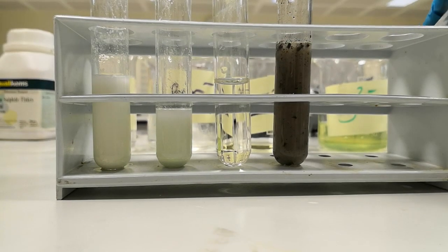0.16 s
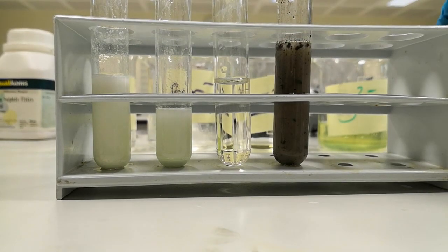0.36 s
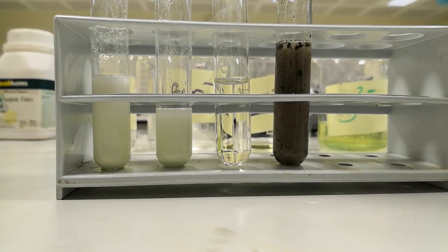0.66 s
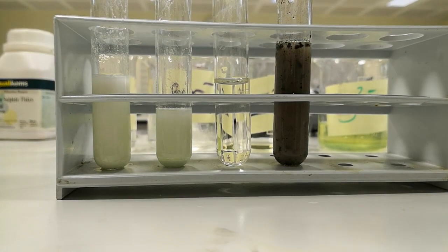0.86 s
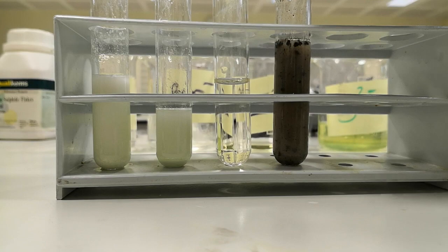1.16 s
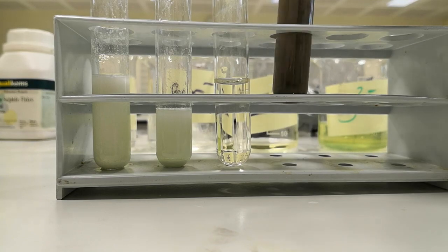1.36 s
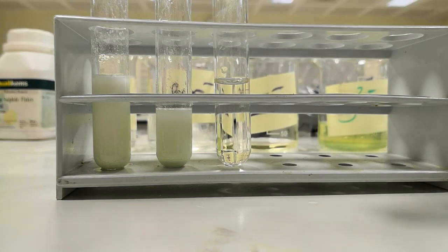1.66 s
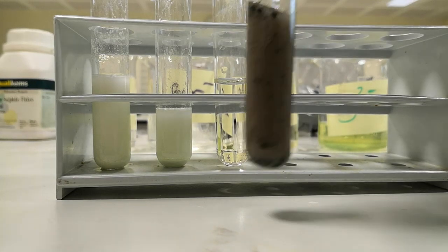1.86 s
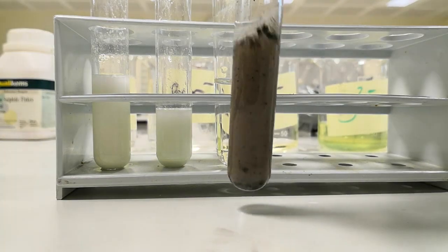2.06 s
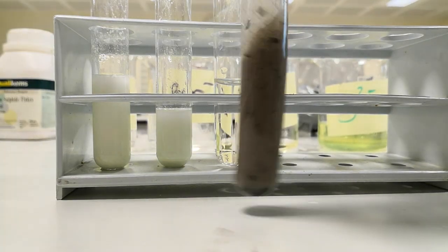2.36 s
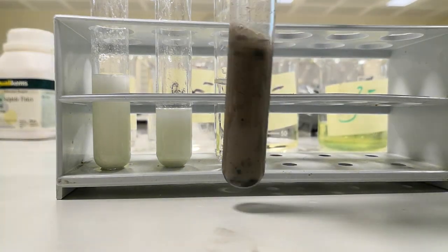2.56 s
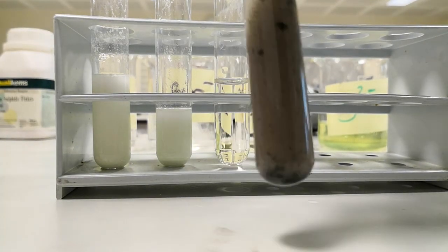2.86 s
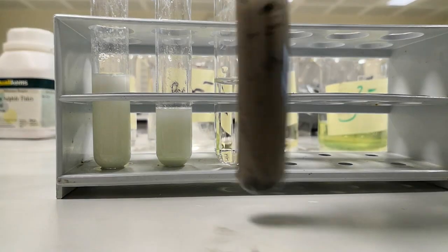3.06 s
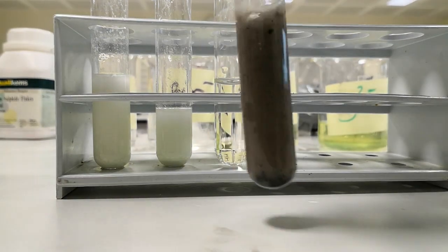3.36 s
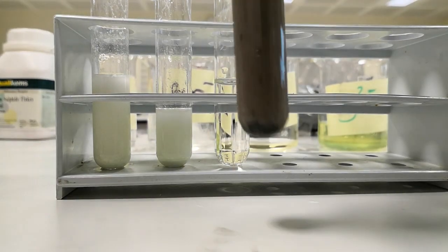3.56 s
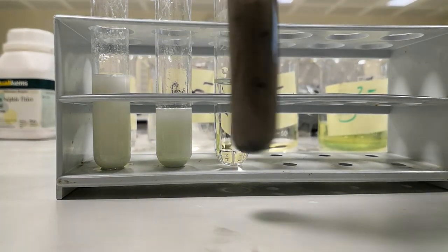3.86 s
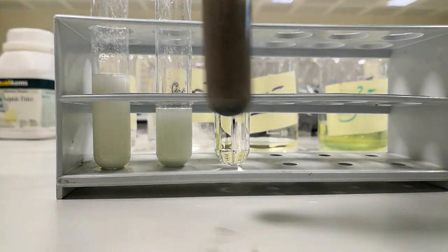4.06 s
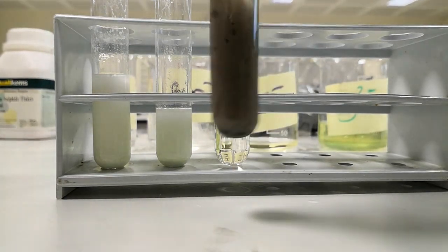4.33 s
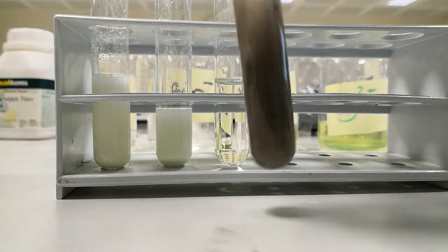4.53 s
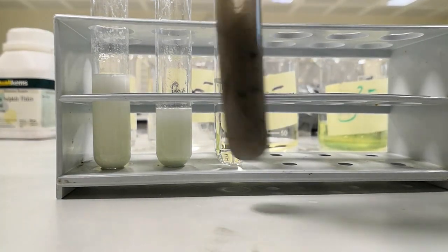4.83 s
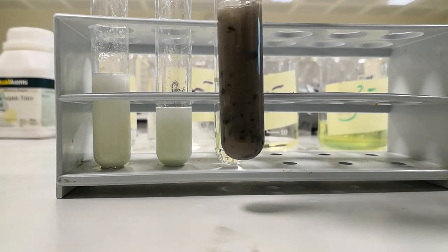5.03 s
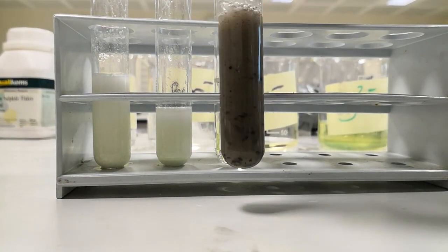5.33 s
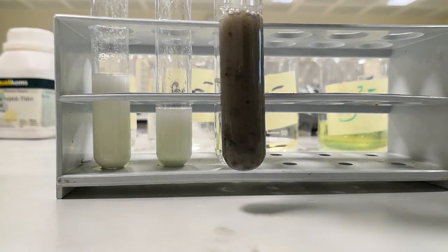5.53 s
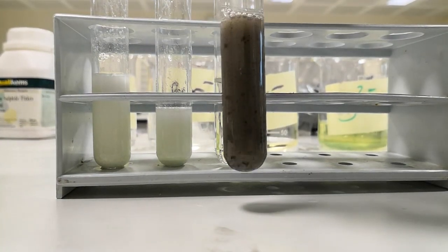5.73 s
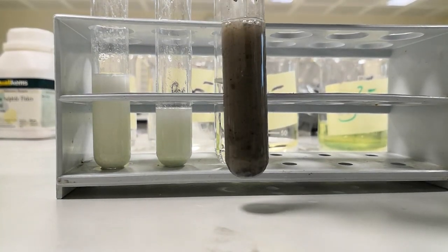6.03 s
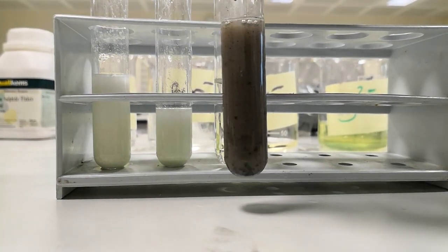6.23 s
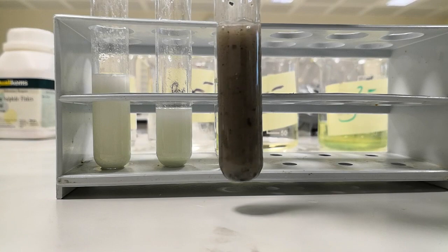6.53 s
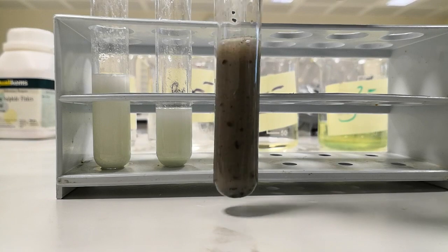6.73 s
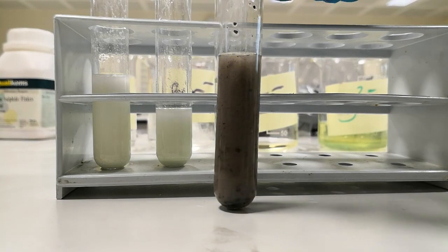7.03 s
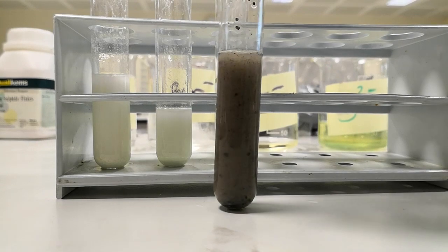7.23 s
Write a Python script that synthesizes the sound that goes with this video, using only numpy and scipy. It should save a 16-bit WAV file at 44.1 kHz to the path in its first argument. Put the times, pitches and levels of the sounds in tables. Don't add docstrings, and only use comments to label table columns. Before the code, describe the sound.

Low ventilation hums in a small quiet laboratory. A gloved hand knocks a sheet-metal test tube rack twice, and it rocks in quick weakening bumps. A full tube scrapes dully past the shelves, then gives one sharp glass clink on metal. After a near-quiet gap come faint ticks and a brief shake with wet plops, and finally the tube taps down on the bench, close to stereo microphones.

```python
import sys
import numpy as np
from scipy import signal
from scipy.io import wavfile
from scipy.ndimage import map_coordinates

SR = 44100
rng = np.random.default_rng(int(sys.argv[2]) if len(sys.argv) > 2 else 0)


def generate_wav(sig):
    pcm = np.round(np.clip(np.atleast_2d(sig).T, -1, 1) * 32767).astype(np.int16)
    wavfile.write(sys.argv[1], SR, pcm)


def volts(x):
    e = np.asarray(x, float) / 20
    return 10 ** e


N = 325782


def at_hz(points, hz, axis=1):
    points = np.array(points)
    return np.interp(np.log(hz), np.log(points[:, 0]), points[:, axis])


def rms_one(x):
    return x / np.sqrt(np.mean(x ** 2) + 1e-20)


def drift(rate_hz):
    knots = rng.standard_normal(int(rate_hz * N / SR) + 4)
    coarse = np.arange(0, N + 64, 64)
    return np.interp(np.arange(N), coarse, map_coordinates(knots, [coarse * rate_hz / SR], order=2))


def dying(clicks, t60_s):
    return signal.lfilter([1], [1, -volts(-60 / (t60_s * SR))], clicks + 1e-18)


def add(out, start_s, wave):
    i = int(start_s * SR)
    out[:, i:i + wave.shape[1]] += wave[:, :N - i]


BAND_EDGES_HZ = 20 * 2 ** np.arange(0, 9.8, .5)
# pitch_hz, correlation
LIKENESS = [(60, .99), (130, .94), (290, .67), (640, -.34), (1410, -.19), (3100, 0)]


def noise_bands(size, lowest_hz=0):
    settle = SR // 4
    white = rng.standard_normal((2, 2, size + settle))
    for k, (low, high) in enumerate(zip(BAND_EDGES_HZ, BAND_EDGES_HZ[1:])):
        hz = np.sqrt(low * high)
        if hz > lowest_hz:
            band = signal.butter(3, [low, high], "band", fs=SR, output="sos")
            mid, side = signal.sosfilt(band, white[k % 2])[:, settle:]
            alike = np.clip(at_hz(LIKENESS, hz), -1, 1)
            yield hz, np.sqrt(1 + alike) * mid + np.sqrt(1 - alike) * side * [[1], [-1]]


# pitch_hz, level_db (per Hz)
VENT = [(12, -29), (20, 5), (81, -3.5), (101, -20), (130, -8.5), (154, -18), (228, -12.5), (255, -16),
        (347, -22.5), (590, -26), (849, -13), (1810, -17.5), (2600, -21), (3740, -30.5), (7520, -45.5),
        (16000, -55.5)]
# pitch_hz, width_hz, level_db
FANS = [(75.88, 16, -8), (128.5, 9, -11), (199.4, 23, -10), (296.6, 27, -16), (4330, 40, -29)]


def ventilation(bands):
    vent = 0
    for hz, band in bands:
        vent = vent + volts(at_hz(VENT, hz) + 0.7 * drift(1)) * band
    vent = rms_one(vent)
    for hz, width_hz, level_db in FANS:
        r = np.exp(-np.pi * width_hz / SR)
        resonance = [1, -2 * r * np.cos(2 * np.pi * hz / SR), r * r]
        hum = signal.lfilter([1, 0, -1], resonance, rng.standard_normal(N))
        vent = vent + volts(level_db) * rms_one(hum)
    return volts(-61.5) * vent


# peak_s, level_db, rise_db_per_s, fall_db_per_s
HAND = [
    (.46, -72, 51, 61),
    (.72, -76, 28.5, 14),
    (2.41, -83, 39.5, 70),
    (3.0, -81, 24.5, 23),
    (4.44, -74.5, 19, 34),
    (6.9, -88, 20, 15),
    (7.19, -66, 60, 32),
]


def hand_db():
    peak_s, level_db, rise, fall = np.transpose(HAND)[:, :, None]
    coarse_s = np.arange(0, N, 100) / SR
    swell_db = level_db + np.minimum(rise * (coarse_s - peak_s), fall * (peak_s - coarse_s))
    at_rest_db = -95
    power = volts(2 * swell_db).sum(axis=0) + volts(2 * at_rest_db)
    return np.interp(np.arange(N) / SR, coarse_s, 10 * np.log10(power))


# pitch_hz, level_db (per Hz)
RUSTLE = [(1800, -30), (2800, -7.5), (4000, -11), (6000, -5), (8600, -11), (12000, -31.5), (15000, -40)]


def glove_rustle(bands):
    rustle = 0
    for hz, band in bands:
        if hz > 2500:
            rustle = rustle + volts(at_hz(RUSTLE, hz) + 1.5 * drift(25)) * band
    rustle = rustle + 2.5 * signal.lfilter(*signal.iirpeak(7500, 5.0, fs=SR), rustle)
    creases = (rng.random(N) < 120 / SR) * rng.exponential(1, N)
    rustle = rms_one(rustle * (1 + .5 * dying(creases, .01)))
    return volts(hand_db() - 2) * rustle


# pitch_hz, level_db, t60_s
ROOM = [(100, -16, .4), (400, -13, 0.32), (1500, -18, 0.61), (5000, -19, 0.4), (12000, -26.5, 0.4)]


def room(x):
    t = np.arange(SR * 3 // 4) / SR
    tail = 0
    for hz, band in noise_bands(len(t), lowest_hz=70):
        tail = tail + band * volts(at_hz(ROOM, hz) - 60 * t / at_hz(ROOM, hz, axis=2))
    build_up = 1 - np.exp(-t / 0.0099)
    return signal.fftconvolve(x[:1], 0.025 * tail * build_up, axes=1)[:, :N]


def ring(modes, gains, pan_db, lag_s, rise_s):
    hz, level_db, t60_s = np.array(modes, float).T[:, :, None, None]
    t60_s = np.clip(t60_s, .002, .5)
    length = int(t60_s.max() * SR * 0.71)
    t = np.maximum(np.arange(length) / SR - np.array([[0], [lag_s]]), 0)
    ears = volts(np.reshape(pan_db, (-1, 1, 1)) * [[.5], [-.5]])
    waves = np.exp(-np.log(1000) * t / t60_s) * np.sin(2 * np.pi * hz * t)
    mix = np.sum(np.reshape(gains, (-1, 1, 1)) * volts(level_db) * ears * waves, axis=0)
    return mix * (1 - np.exp(-t / rise_s)) ** 2


def blows(contacts, brief, body, ears, lag_s, rise_cycles=0.99, spread_db=1.5, level_db=-5.5):
    out, modes = np.zeros((2, N)), np.array(brief + body, float)
    mode_hz = modes[:, 0]
    long_ring = np.arange(len(modes)) >= len(brief)
    for start_s, peak_db, hard_hz, ring_db, _ in contacts:
        chance = volts(spread_db * rng.standard_normal(len(modes))) * (-1) ** np.arange(len(modes))
        reach = 1 / (1 + (mode_hz / hard_hz) ** 4)
        gains = volts(peak_db + level_db + ring_db * long_ring) * chance * reach
        add(out, start_s, ring(modes, gains, at_hz(ears, mode_hz), lag_s, rise_cycles / hard_hz))
    return out


def of_hardness(contacts, hard_hz):
    return [(s, peak_db, hard_hz, ring_db, clatter_db) for s, peak_db, ring_db, clatter_db in contacts]


# pitch_hz, pan_db
RACK_EARS = [(100, 0), (300, 0), (600, 5), (740, 9), (870, -6), (1010, 9), (1250, -3), (1900, 5),
             (4400, .5), (8120, 7)]


def clatter(bodies, bands):
    out = np.zeros((2, N))
    for hz, band in bands[4:]:
        level = 0
        for contacts, table in bodies:
            start_s, peak_db, _, _, clatter_db = np.transpose(contacts)
            chance_db = 1.5 * rng.standard_normal(len(start_s))
            clicks = np.zeros(N)
            clicks[(start_s * SR).astype(int)] = volts(peak_db + clatter_db + at_hz(table, hz) + chance_db)
            quick = dying(clicks, at_hz(table, hz, axis=2))
            slow = volts(at_hz(table, hz, axis=3)) * dying(clicks, at_hz(table, hz, axis=4))
            level = level + quick + slow
        swell = np.exp(-hz / SR * 1.1)
        level = signal.lfilter([(1 - swell) ** 2], [1, -2 * swell, swell ** 2], level)
        ears = volts(at_hz(RACK_EARS, hz) * np.array([[.5], [-.5]]))
        out += level * rms_one(band) * ears
    return out


# start_s, level_db, ring_db, clatter_db
SET_DOWN = [
    (6.976, -15.5, -12, -11),
    (6.983, -21, -8, -19),
]
# pitch_hz, level_db, t60_s
TAP = [(465, -9, .03), (608, -5, .03), (760, -2, .035), (910, -2, .05), (1025, -2, .03), (1220, -6, .02),
       (1950, 3, .025), (2690, -6, .022), (4080, -8, .035)]
BENCH = [(242, -8, .2), (290, -8, .1), (608, -12, .2), (791, -8, .14), (888, 0, .14), (1066, -10, .2),
         (1168, -6, .07), (1367, -16, .2), (1486, -6, .3), (1800, -11, .3), (1965, -5, .15),
         (2300, -14, .2), (2476, -21, .2), (2676, -24, .15)]
# pitch_hz, pan_db
BENCH_EARS = [(200, 1), (470, 2), (750, 9), (1020, 12), (1220, -2), (1950, -11), (2690, 15), (4080, 2)]
# pitch_hz, level_db, quick_t60_s, slow_db, slow_t60_s
BENCH_CLATTER = [(119, -22.5, 0.044, -15.5, 1), (444, -10.5, 0.05, -20, 0.26),
                 (1000, -3.5, 0.045, -15, 0.28), (2380, -10, 0.034, -16, .3), (3200, -20, .03, -16, .25),
                 (5000, -27.5, 0.016, -18.5, 0.62), (11000, -62, 0.023, -6, .2)]


def set_down():
    contacts = of_hardness(SET_DOWN, 5000)
    return blows(contacts, TAP, BENCH, BENCH_EARS, 0.00066, rise_cycles=1.0), (contacts, BENCH_CLATTER)


# start_s, level_db, hardness_hz, clatter_db
DRAWING_OUT = [(1.19, -35, 5000, -11), (1.211, -37, 1300, -20), (1.2235, -35, 3000, -14),
               (1.2315, -42, 1500, -15), (1.257, -36, 1900, -15), (1.2645, -42, 1000, -20),
               (1.2725, -44, 1500, -18), (1.287, -56, 1100, -14), (1.308, -56, 1200, -14),
               (1.329, -57, 1200, -14), (2.374, -36, 6000, -12), (2.43, -43, 1400, -6)]
# pitch_hz, level_db, t60_s
FULL_TUBE = [(240, -9, .05), (470, -14, .04), (810, -9, .05), (1110, -2, .03), (1250, -5, .03),
             (1750, -9, .02), (2320, 3, .022), (2980, -5, .02), (4970, -14, .015)]
# pitch_hz, pan_db
TUBE_EARS = [(300, 0), (810, -3), (1110, 8), (1250, -10), (2320, -5), (2980, 4), (5000, 5)]


def drawn_tube():
    contacts = [(s, peak_db, hard_hz, 0, clatter_db) for s, peak_db, hard_hz, clatter_db in DRAWING_OUT]
    return blows(contacts, [], FULL_TUBE, TUBE_EARS, .00015, level_db=-1.5), contacts


# start_s, level_db, ring_db, clatter_db
CLINK = [
    (2.3546, -11, -1, -31),
]
# pitch_hz, level_db, t60_s
CRACK = [(2500, -9, 0.0032), (4033, .8, .02), (3200, -11, 0.002), (4900, -7, .004), (5700, -5, .004),
         (6400, -2, .005), (8000, -13, .004)]
GLASS = [(4225, 1, .12), (4231, -33, .5), (4209, -32, .5), (4333, -14, .1), (8577, -40, .28),
         (8817, -22, .18), (8793, -27, .15), (10257, -20, .14), (11765, -27, .06), (13310, -42, .25)]
# pitch_hz, pan_db
GLASS_EARS = [(2400, 2.5), (4100, 6), (4209, -12), (4225, 7), (4231, 13), (4300, 5), (8580, 2), (8800, -7),
              (10260, -14), (13000, 4)]
# pitch_hz, level_db, quick_t60_s, slow_db, slow_t60_s
TUBE_CLATTER = [(90, -40, .04, -15.5, .3), (250, -16, 0.027, -12, 0.22), (1030, -2.5, 0.0082, -15, 0.17),
                (2500, -2.5, 0.022, -22, 0.24), (4500, -12, 0.03, -12, .3), (7900, -23, 0.021, -16.5, 0.16),
                (12000, -41, .02, -15, 0.19)]


def glass_clink():
    contacts = of_hardness(CLINK, 12065)
    return blows(contacts, CRACK, GLASS, GLASS_EARS, .00037, rise_cycles=.4, level_db=0.0), contacts


# start_s, level_db, pitch_hz, pan_db
GLUGS = [
    (4.409, -50.5, 872, 6),
    (4.887, -47.5, 876, 25),
    (4.884, -54, 1100, 16),
]
PLOPS = [
    (4.2715, -43, 2244, 11),
    (4.385, -32, 2301, 12),
    (4.8755, -41, 2411, 14),
    (4.884, -49, 2481, 8),
]
POPS = [
    (0.2664, -41, 2650, 7.9),
    (3.1428, -56, 2618, 20),
    (4.4073, -33, 2958, 13.5),
    (4.5367, -53, 2252, 7),
    (4.761, -51, 2484, 13),
]


def spray():
    drops = []
    for start_s, peak_db, _, pan_db in PLOPS[:3] + POPS[2:3]:
        for late, pitch in rng.random((8, 2)):
            hz = 2800 * (6500 / 2800) ** pitch
            drops.append((start_s + .008 + .065 * late ** 2, peak_db - 21 - 6 * late, hz, pan_db))
    return drops


# start_s, level_db, pitch_hz, pan_db
DRIPS = [(3.8208, -49, 5372, 0), (4.1112, -48, 3986, 22), (4.112, -47, 5275, 5), (4.111, -56, 2051, 2),
         (4.112, -59, 2540, 11), (4.2188, -59, 3970, 13.5), (4.231, -55, 3660, 10), (4.258, -58, 5300, 5),
         (4.274, -58, 5000, 8), (4.364, -46, 5682, 6), (4.367, -54, 8360, -2), (4.386, -52, 3997, 9),
         (4.388, -52, 5300, 8), (4.408, -51, 7838, 12), (4.413, -42, 4440, 11), (4.457, -52, 5211, 5),
         (4.49, -39, 5394, 3), (4.5123, -60, 7466, 5), (4.537, -57, 3316, 14), (4.539, -57, 3717, 8),
         (4.6202, -57, 3892, 16), (4.6265, -56, 5260, 4), (4.645, -59, 2384, 7), (4.748, -50, 6629, -5),
         (4.749, -58, 3090, 7), (4.749, -59, 2379, 9), (4.75, -51, 3800, 5), (4.762, -57, 3189, 8),
         (4.762, -56, 3850, 14), (4.874, -52, 4013, 22), (4.874, -50, 5593, 6), (4.878, -48, 4220, 20),
         (4.878, -46, 5808, 12), (4.896, -58, 4500, 8)]
TICKS = [(3.0195, -58, 7480, 2.5), (3.044, -44, 9100, -6), (3.1023, -58, 7750, 2), (3.1123, -57, 8600, 10),
         (3.1323, -58, 7400, -1), (3.2445, -55, 7700, 2.2), (3.709, -43, 5420, -3.5),
         (4.0667, -55.5, 8170, 13), (4.1165, -50, 6450, 11), (4.2617, -49, 12400, 16),
         (4.4563, -46, 6060, 7), (4.47, -62, 4160, 5), (4.538, -60, 9000, 0), (3.71, -52, 7800, 14),
         (5.045, -64, 4500, 5), (4.6453, -53, 7400, -4), (4.9841, -61, 6500, 2.2)]
# start_s, level_db, pan_db
SNAPS = [(0.2897, -49.5, 12), (0.3361, -58, 10), (1.2074, -61, 10), (2.5314, -68, 13.5), (2.7794, -65, 2.5),
         (4.5825, -69, .1), (.243, -52, 12), (5.4394, -76, 3.5), (6.6473, -66.5, 13), (7.0833, -53, 6),
         (7.158, -60, 11), (7.1826, -64, 19)]
# start_s, level_db, pitch_hz, t60_s
TINKLES = [(.243, -50, 4015, .03), (.244, -52, 5500, .02), (.2955, -51.5, 6200, .07),
           (.2965, -55.5, 8600, 0.019), (.3055, -51.5, 6070, 0.055), (.5139, -59.5, 6620, .12),
           (.5125, -53.5, 5800, .035), (1.191, -49, 4045, .07), (1.192, -72, 7170, .15),
           (1.226, -68, 5620, .2), (1.232, -62, 4040, .3), (1.372, -74, 4400, .1)]


def splashes():
    snaps = [(s, peak_db, 7300, pan_db) for s, peak_db, pan_db in SNAPS]
    kinds = [
        (GLUGS, (0.084, -41, 1.07, -5)),
        (PLOPS, (.024, -21.5, 1.11, 5)),
        (POPS, (.024, -21.5, 1.07, -12)),
        (DRIPS + spray(), (.016, 4, 1.07, -12)),
        (TICKS, (0.0027, 16.8, 1.07, -9)),
        (snaps, (.005, -3, 1.07, -9))]
    events = [(s, peak_db, hz, *kind, pan_db) for rows, kind in kinds for s, peak_db, hz, pan_db in rows]
    return events + [(*row, -15, 1.07, -15, 4.5) for row in TINKLES]


# pitch_hz, level_db, t60_s
AIR_COLUMN = [(870, -26, .06), (2550, -22, .035), (4100, -22, .04), (5600, -24, .035), (7500, -26, .03)]


def slurry():
    out, t = np.zeros((2, N)), np.arange(SR // 50) / SR
    for start_s, peak_db, hz, t60_s, spatter_db, ratio, second_db, pan_db in splashes():
        modes = np.array([(hz, 3, t60_s), (hz * ratio, second_db, .022)] + AIR_COLUMN)
        modes[2:, 0] *= 1 + .03 * rng.standard_normal(len(AIR_COLUMN))
        octaves_away = np.abs(np.log2(modes[:, 0] / hz))
        gains = volts(peak_db + 1.2 * rng.standard_normal(len(modes)) - 6 * octaves_away)
        gains[1] *= -1
        add(out, start_s, ring(modes, gains, pan_db, .0004, 1.5 / hz))
        edges_hz = [min(hz * 0.61, 5000), min(hz * 1.7, 15500)]
        bright = signal.butter(1, edges_hz, "band", fs=SR, output="sos")
        burst = rng.standard_normal((2, len(t))) * volts(-60 * t / 0.0034) * (t > .0005)
        add(out, start_s, volts(peak_db + spatter_db) * signal.sosfilt(bright, burst))
    return out


LANDINGS_S = [0.629, .683, 0.74, 0.802, 0.87, 0.928, .982, 1.03, 1.078]
# start_s, level_db, ring_db, clatter_db
NUDGES = [
    (0.574, -42, 11, -23),
    (.654, -33, -2, -8),
]
# pitch_hz, level_db, t60_s
SWAY = [(195.6, -15, 0.16), (234, -1, 0.11), (483, -14, 0.096), (798, -3, 0.05), (1050, -9, 0.04)]
# pitch_hz, level_db, quick_t60_s, slow_db, slow_t60_s
SWAY_CLATTER = [(100, -26, 0.15, -20.5, .3), (240, -8, 0.033, -19.5, 0.07), (1000, -14.5, 0.07, -20, 0.13),
                (1450, -26, 0.03, -19, .3), (3000, -40, 0.12, -9.5, 0.4), (5500, -62, .1, -10, .3)]


def rocking_rack():
    first_foot = [(s, -28 - 2.8 * k, -2.5, -7.5) for k, s in enumerate(LANDINGS_S)]
    second_foot = [(s + 0.012, peak_db - 3, *rest) for s, peak_db, *rest in first_foot]
    contacts = of_hardness(first_foot + second_foot + NUDGES, 1002.7)
    sound = blows(contacts, [], SWAY, RACK_EARS, 0.00029, rise_cycles=2.5, spread_db=2.1)
    return sound, (contacts, SWAY_CLATTER)


# start_s, level_db, ring_db, clatter_db
FIRST_KNOCK = [
    (0.242, -29, -14, -8),
    (0.2945, -6, -12, -14),
    (0.305, -8, -14, -19),
    (0.312, -16, -19, -24),
]
SECOND_KNOCK = [
    (0.506, -24, -20, -30),
    (0.5095, -8, -12, -13),
    (0.5145, -11, -16, -25),
]
# pitch_hz, level_db, t60_s
THUD = [(230, -6, .03), (600, -1, .03), (720, 4, .03), (865, 2, .03), (1005, 0, .03), (1260, -2, .025),
        (1865, -5, .02), (2666, -1, .015)]
SIDE_THUD = [(225, -5, .03), (400, -24, .03), (555, -8, .03), (683, 7, .035), (880, -1, .03),
             (1045, 0, .03), (1260, -4, .025), (1560, -3, .02), (2250, 8, .025)]
RACK_TOP = [(102, -8, .29), (195, -6, .25), (258, -8, .25), (301, -3, .25), (415, -16, .3), (608, -8, .22),
            (797, 0, .22), (904, -5, .28), (974, -3, .24), (1093, -12, .3), (1200, -12, .25),
            (1367, -6, .24), (1480, -4, .25), (2013, -18, .3)]
RACK_SIDE = [(151, -17, .3), (258, -7, .15), (382, -19, .15), (495, -5, .2), (705, -10, .4), (861, 0, .16),
             (985, -4, .25), (1077, -1, .14), (1254, -2, .09), (1378, -6, .14), (1712, -14, .16),
             (1906, -3, .12), (2202, -4, .14)]
# pitch_hz, level_db, quick_t60_s, slow_db, slow_t60_s
RACK_CLATTER = [(70, -31, 0.13, -13.5, .3), (133.2, -11.5, 0.049, -19.5, 0.48),
                (300, -14.5, 0.05, -14, 0.41), (1000, 1, 0.029, -19, 0.3), (1836, -17.5, .06, -11.5, 0.57),
                (2897, -29, .04, -20, 0.24), (4823, -46.5, 0.044, -16, 0.25), (7500, -37, 0.028, -10, .2),
                (11200, -71.5, 0.044, -15.5, .2)]


def knocked_rack():
    first, second = of_hardness(FIRST_KNOCK, 1400), of_hardness(SECOND_KNOCK, 1400)
    sound = blows(first, THUD, RACK_TOP, RACK_EARS, 0.00069)
    sound += blows(second, SIDE_THUD, RACK_SIDE, RACK_EARS, 0.00071, rise_cycles=1.4)
    return sound, (first + second, RACK_CLATTER)


def scene():
    bands = list(noise_bands(N))
    bench, bench_clatter = set_down()
    tube, brushes = drawn_tube()
    glass, clink = glass_clink()
    rocks, rock_clatter = rocking_rack()
    knocks, knock_clatter = knocked_rack()
    rack, close = knocks + rocks, tube + bench + slurry()
    crowd = clatter([knock_clatter, rock_clatter, (brushes + clink, TUBE_CLATTER), bench_clatter], bands)
    tail = room(rack + volts(-12) * glass + volts(-6) * close)
    return rack + glass + close + tail + crowd + ventilation(bands) + glove_rustle(bands)


def band_limit(x):
    return signal.sosfilt(signal.butter(12, 15600, fs=SR, output="sos"), x)


def record(dry):
    port = signal.lfilter(*signal.iirpeak(7550, 7.5, fs=SR), dry)
    heard = signal.sosfilt(signal.butter(2, 10500, fs=SR, output="sos"), dry + .9 * port)
    hiss = volts(-81.5) * rng.standard_normal(dry.shape)
    return band_limit(heard + hiss)


dry = scene()
out = record(dry)
generate_wav(out)
```